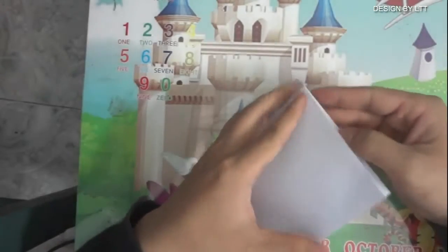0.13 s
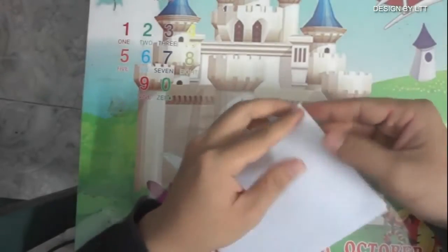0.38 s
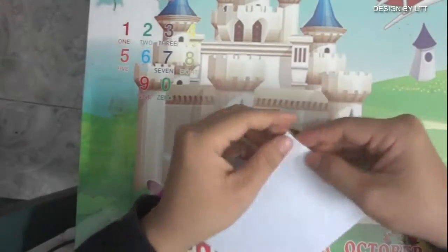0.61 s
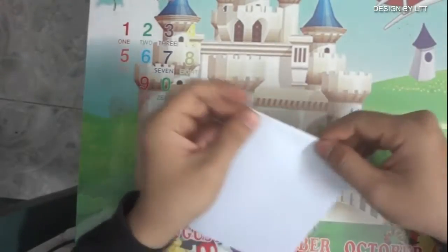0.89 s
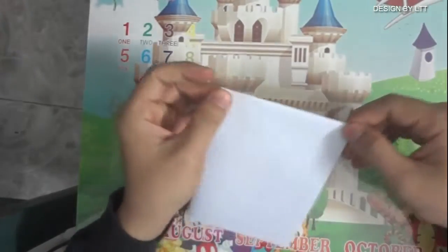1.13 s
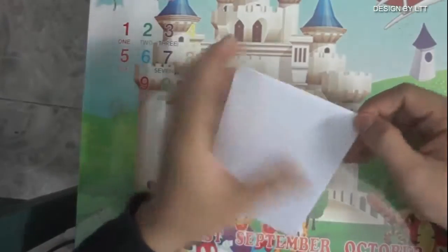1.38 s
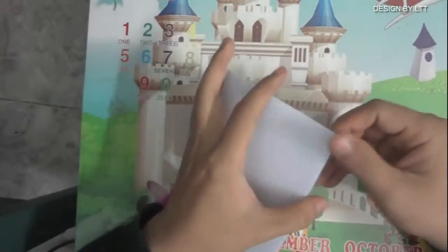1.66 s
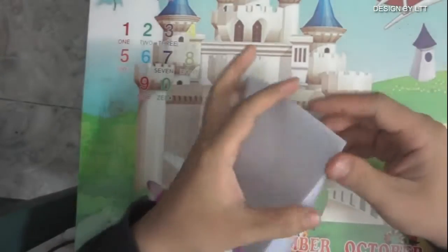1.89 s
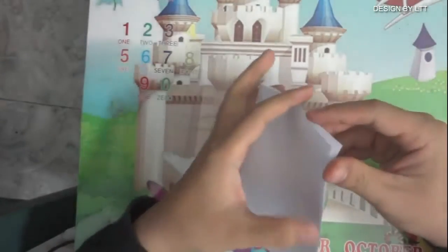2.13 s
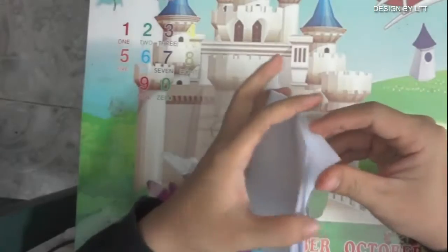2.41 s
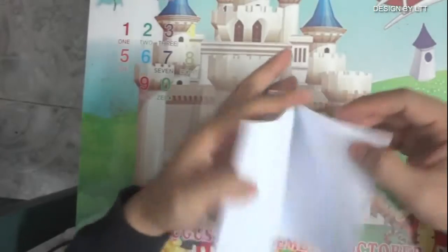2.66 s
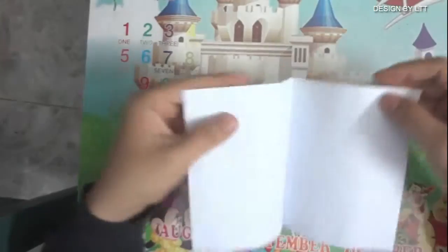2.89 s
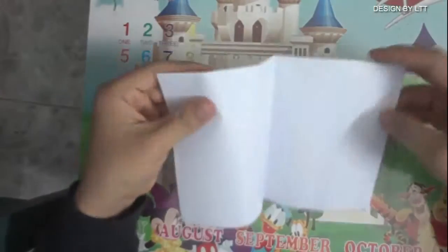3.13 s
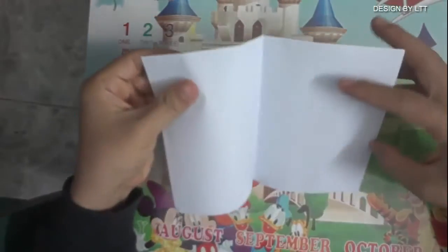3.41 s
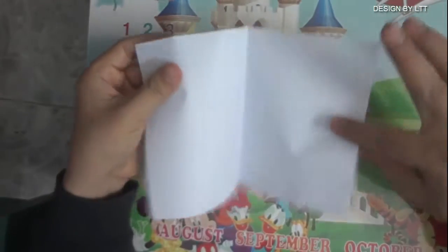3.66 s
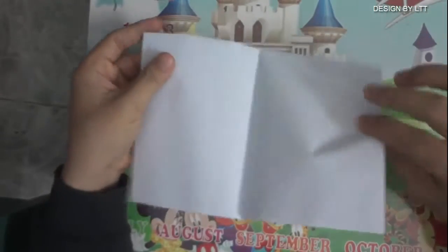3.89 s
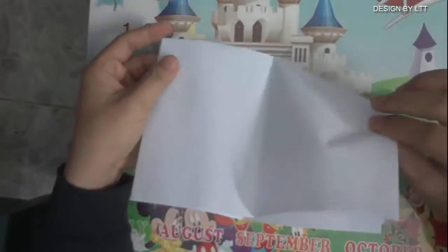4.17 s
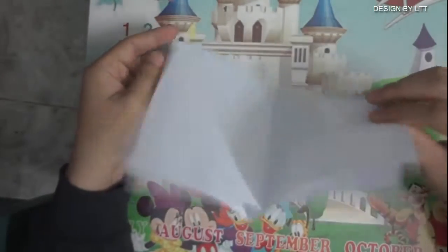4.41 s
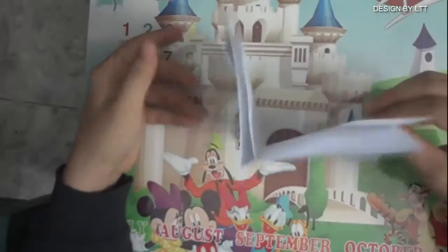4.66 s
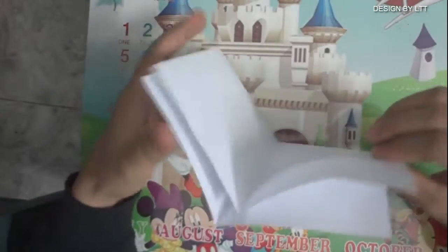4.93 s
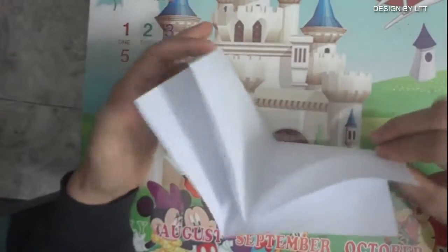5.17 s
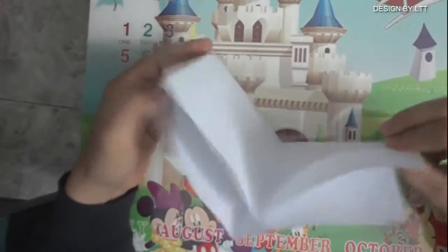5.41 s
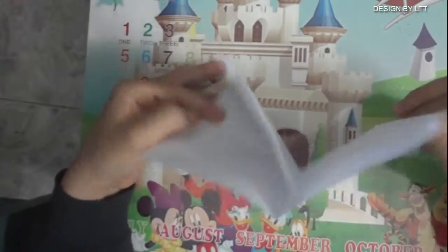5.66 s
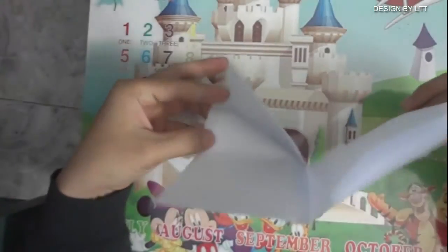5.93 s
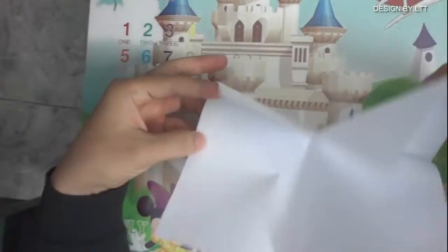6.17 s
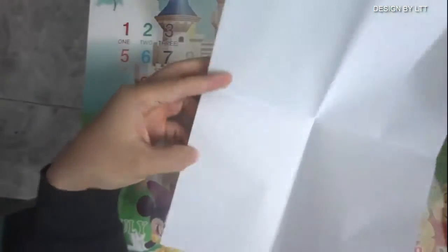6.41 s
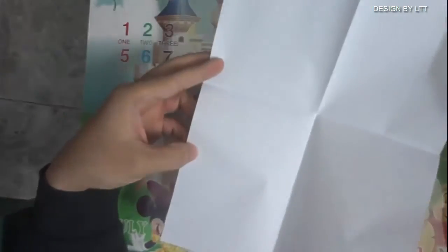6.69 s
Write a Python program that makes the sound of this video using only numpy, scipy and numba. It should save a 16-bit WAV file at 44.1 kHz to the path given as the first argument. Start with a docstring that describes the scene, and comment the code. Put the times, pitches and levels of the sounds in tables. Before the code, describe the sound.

Close in stereo, hands handle a sheet of paper in a small room with a machine humming and blowing steadily. Faint ticks and soft rubbing come first, then harder snaps and short scrapes as the folds buckle. The opened sheet hisses, drags and flutters with light fingertip bumps and puffs of air. A last burst of hard snaps fades into soft rubbing.

```python
"""Hands crease, open and turn a sheet of paper just below a small stereo microphone indoors.
All through, a machine nearby hums and blows, and the room briefly answers the paper.
First come faint snaps and soft rubbing; from about 2 s folds buckle with harder snaps and short scrapes.
At 3 s the sheet lies open: skin and edges hiss in grainy strokes, edges drag, fingertips bump, air puffs.
Near 6.1 s come a last few hard snaps, then the rubbing dies away."""
import sys
import numpy as np
from scipy import signal
from scipy.fft import rfft, irfft, next_fast_len
from scipy.io import wavfile
from scipy.ndimage import uniform_filter1d
from numba import njit

SR = 44100
rng = np.random.default_rng(int(sys.argv[2]) if len(sys.argv) > 2 else 0)


def inscribe(sig):
    """Save sig as 16-bit PCM at rate SR to the path in sys.argv[1].

    A 1-D sig is mono; a 2-D sig holds one channel per row.
    Samples are clipped to [-1, 1] before scaling.
    """
    pcm = np.round(np.clip(np.atleast_2d(sig).T, -1, 1) * 32767)
    wavfile.write(sys.argv[1], SR, pcm.astype(np.int16))


def decibels_to_gain(level_db):
    """Convert a level in decibels to a linear amplitude gain (20 dB per decade)."""
    exponent = np.asarray(level_db, float) / 20
    return 10 ** exponent


N = 300321
T = np.arange(N) / SR
SIDES = np.array([[1], [-1]])  # left, right


def level(x, db):
    """Set the rms level, which is the average strength of a sound."""
    return x * decibels_to_gain(db) / np.sqrt(np.mean(x ** 2))


def along(table, hz):
    """Read (Hz, value) points on a log-frequency axis."""
    points_hz, values = np.transpose(table)
    return np.interp(np.log(hz + 1), np.log(points_hz), values)


@njit
def svf(x, hz, width):
    """State-variable band-pass whose centre may move, gain 1 at the centre."""
    y, b, l = np.empty(len(x)), 0., 0.
    for i in range(len(x)):
        g, k = np.tan(np.pi * hz[i] / SR), width / hz[i]
        v = (b + g * (x[i] - l)) / (1 + g * (g + k))
        b, l, y[i] = 2 * v - b, l + 2 * g * v, k * v
    return y


def band(x, hz, width):
    """One resonance, fixed or moving."""
    return svf(x, np.clip(hz + np.zeros(len(x)), 20, SR / 2.3), 1. * width)


def walk(rate):
    """Slow random wandering: levels held 1 / rate s and smoothed twice; spread near 1."""
    k = int(SR / rate)
    held = np.repeat(rng.standard_normal(N // k + 1), k)
    return 1.23 * uniform_filter1d(uniform_filter1d(held, k), k)[:N]


def swell(s, rise_s, fall_s, peak_db):
    """Power of a gesture that climbs to its peak and dies away at even rates in dB."""
    late = T - s
    return decibels_to_gain(2 * (peak_db - 10 * np.where(late < 0, -late / rise_s, late / fall_s)))


def grit(n, spread_db):
    """Fibres catching and letting go: dense clicks of unequal but bounded size."""
    noise = rng.standard_normal(n)
    size = np.minimum(rng.exponential(size=n), np.log(50))
    return level(noise * decibels_to_gain(spread_db * size), 0)


# tones of the machine, before MACHINE_DB and the drift: (pitch [Hz], width of the wavering [Hz], level [dB])
HUM_TONES = [(241.7, 4.5, -67), (1034.3, 6.04, -62)]
# the hum sinks and grows slowly: (time [s], level [dB])
HUM_DRIFT = [(0, 0.5), (.9, -2.5), (2.9, 0.5), (3.2, 0.5), (5.9, 1.5), (6.8, -1.5)]
# tint of the air noise: (frequency [Hz], relative level per Hz [dB])
AIR_SPECTRUM = [(18, -15), (35, -34), (52, 3), (90, -11), (200, -4), (450, -7), (800, -3), (1050, 0),
                (1400, -6.5), (2500, -5), (3150, -12.5), (3470, -3), (3800, -13.5), (5000, -14.5),
                (9000, -23), (16000, -35)]
# how alike left and right air noise are: (frequency [Hz], likeness [0-1])
AIR_ALIKE = [(30, .97), (130, 0.5), (400, 0), (1400, 0.28), (4000, 0.66), (12000, 0.2)]
AIR_DB = -55  # before MACHINE_DB
MACHINE_DB, MACHINE_LEFT_DB = 2, 2.5  # gain of the whole machine; how much louder it is on the left
HUM_SWELL_DB = 1


def machine():
    """Air noise and a few wavering tones; bass and treble are more alike left and right than the middle."""
    n = next_fast_len(N)
    hz = np.arange(n // 2 + 1) * SR / n
    alike = np.clip(along(AIR_ALIKE, hz), 0, 1)
    mid, side = (rfft(rng.standard_normal(n)) * decibels_to_gain(along(AIR_SPECTRUM, hz)) for _ in range(2))
    mid = irfft(mid * np.sqrt(1 + alike), n)[:N]
    side = irfft(side * np.sqrt(1 - alike), n)[:N]
    air = level(mid + side * SIDES, AIR_DB)
    tones = np.zeros(N)
    for tone_hz, width, db in HUM_TONES:
        # each tone drifts in pitch over its width and a little in level
        loudness = decibels_to_gain(db + 2.14 * walk(15) + HUM_SWELL_DB * walk(2.86))
        phase = 2 * np.pi * np.cumsum(tone_hz + width / 2 * walk(25.02)) / SR
        tones += loudness * np.sqrt(2) * np.sin(phase)
    hum = tones * decibels_to_gain(np.interp(T, *np.transpose(HUM_DRIFT)))
    return (air + hum) * decibels_to_gain(MACHINE_DB + MACHINE_LEFT_DB / 2 * SIDES)


ROOM_DB, ROOM_T60_S, ROOM_ALIKE = -11, 0.35, 0.61  # level re the paper, time to die by 60 dB, likeness 0-1


def room(x):
    """Diffuse echoes with softened treble, partly different on each side, that die away evenly."""
    t = np.arange(SR // 2) / SR
    mid, side = rng.standard_normal((2, len(t)))
    tails = mid * np.sqrt(1 + ROOM_ALIKE) + side * np.sqrt(1 - ROOM_ALIKE) * SIDES
    tails = tails * decibels_to_gain(-60 * t / ROOM_T60_S) * (1 - np.exp(-t / 0.0016))
    tails = np.array([band(tail, 4000 / 3, 4000) + 1.16 * tail for tail in tails])
    tails /= np.sqrt(np.sum(tails ** 2) / 2)
    return decibels_to_gain(ROOM_DB) * signal.fftconvolve(x[None], tails, axes=1)[:, :N]


# puffs of air as the sheet swings; rise and fall are times for 10 dB:
# (time of the peak [s], rise [s], fall [s], level [dB])
PUFFS = [(.52, .3, 0.065, -59), (2.03, 0.14, 0.13, -60), (2.75, 0.15, 1, -56.5), (3.77, 0.061, 0.047, -56),
         (4.04, 0.17, 0.12, -59.5), (4.3, 0.33, 0.062, -54), (4.49, 0.032, 0.025, -45.5),
         (4.6, 0.14, 0.43, -50.5), (4.96, 0.13, 0.16, -49.5), (5.3, 0.39, 0.93, -55),
         (6.07, 0.025, .3, -52), (6.45, 0.045, 0.15, -51.5)]
STILL_DB = -64.5  # air between the puffs


def waft():
    """Air pushed by the sheet and the hands: a low, uneven flutter, partly different left and right."""
    mid = band(band(rng.standard_normal(N), 94, 750), 136, 690)
    side = band(band(rng.standard_normal(N), 440, 480), 230, 610)
    flutter = (mid + 0.73 * side * SIDES) * decibels_to_gain(2.8 * walk(25))
    power = decibels_to_gain(2 * STILL_DB) + sum(swell(*puff) for puff in PUFFS)
    return level(flutter, 0) * np.sqrt(power)


# fingertips and creases bump the desk or the sheet:
# (time [s], peak level [dB], ring pitch [Hz], decay by 60 dB [ms])
BUMPS = [(2.706, -31, 866, 27), (2.74, -52, 77, 500), (4.58, -50, 138, 300), (4.68, -49, 199, 152),
         (4.951, -50, 54.7, 500), (5.16, -53, 52.4, 500), (5.3, -58, 55, 500), (6.443, -40, 920, 18),
         (3.613, -31, 1060, 27), (4.005, -36.5, 706, 31), (4.478, -44, 345, 50), (4.482, -41, 634, 40),
         (4.574, -40, 505, 40), (4.909, -26.5, 630, 11), (4.945, -38, 460, 46), (5.275, -45, 705, 34),
         (6.255, -33, 688, 23), (6.437, -38, 844, 37), (6.44, -42, 269, 65)]


def bumps():
    """A soft blow, slower on larger panels: the panel rings low for a few cycles, a little rough."""
    out, t = np.zeros(N + SR // 2), np.arange(SR // 2) / SR
    for s, peak_db, ring_hz, decay_ms in BUMPS:
        blow_s, blow_width_s = max(.0012, 0.46 / ring_hz), max(0.00028, .12 / ring_hz)
        blow = np.exp(-((t - blow_s) / blow_width_s) ** 2)
        roughness = 0.056 * rng.standard_normal(len(t)) * np.exp(-t / 0.0076)
        # the narrower the resonance, the longer it rings
        ring = band(band(blow + roughness, ring_hz, 2200 / decay_ms), ring_hz, 2.0 * ring_hz)
        i = int(s * SR)
        out[i:i + len(t)] += decibels_to_gain(peak_db) * ring / np.abs(ring).max()
    return out[:N]


def desk(x, lag_ms, share):
    """The desk top returns an echo and a weaker second one right behind the sound, combing the treble."""
    i = np.arange(len(x))
    return x + sum(share ** k * np.interp(i - k * lag_ms * SR / 1000, i, x) / k for k in (1, 2))


# an edge dragged at an even pace, level before the fades:
# (time [s], length [ms], level [dB], centre [Hz], lag of the desk echo [ms])
DRAGS = [(0.861, 460, -58.5, 9250, 0.606), (1.822, 13, -42, 2780, 0.51), (1.939, 9, -39, 3360, .6),
         (3.901, 38, -50, 6000, .6), (4.004, 13, -37.5, 4530, 0.63), (4.02, 102, -36, 4880, 0.64),
         (4.373, 86, -37.5, 4570, .68), (4.141, 9.2, -28.5, 4700, 0.73), (4.172, 13, -34, 4330, 0.63),
         (4.249, 11, -37, 4200, 0.66), (4.283, 12.7, -38, 4340, 0.64), (4.677, 41, -43, 4280, 0.57),
         (4.729, 20.4, -37, 4230, 0.64), (4.798, 64, -35, 4640, 0.61), (4.909, 10, -34.5, 5300, 0.606),
         (4.945, 17, -35, 4260, 0.62), (5.424, 15, -39, 5030, .68), (5.452, 15, -40.5, 4860, 0.79),
         (5.474, 14, -38.5, 5000, 0.66), (5.567, 34, -33, 6500, .5), (5.61, 272, -43, 5200, .6),
         (5.735, 58, -43.5, 9000, .56), (5.957, 31, -42, 4470, 0.55), (6.063, 7, -29, 6000, 0.62)]
DRAG_ECHO, BLUR_MS = 0.9, 300  # share of the desk echo for the shortest drags; longer ones blur it away


def drags():
    """Gritty, slightly stuttering hiss with fades that grow with its length, close over the desk."""
    out, t = np.zeros(N), np.arange(SR // 2) / SR
    for s, length_ms, drag_db, centre_hz, lag_ms in DRAGS:
        length_s = length_ms / 1000
        fibres = band(grit(len(t), spread_db=5.0), centre_hz, 0.7 * centre_hz)
        stutter = decibels_to_gain(1.1 * walk(117)[:len(t)])
        hiss = band(fibres * stutter, centre_hz, 2.1 * centre_hz)
        hiss = desk(hiss, lag_ms, DRAG_ECHO * np.exp(-length_ms / BLUR_MS))
        hiss = hiss * decibels_to_gain(drag_db) / hiss[:int(length_ms * SR / 1000)].std()
        start = 1 - np.exp(-t / (0.0009 + 0.03 * length_s))
        stop = 1 / (1 + np.exp((t - length_s) / (.0005 + 0.077 * length_s)))
        i = int(s * SR)
        out[i:i + len(t)] += hiss * start * stop
    return out


def patchy(x, patchy_db):
    """The sheet bends all the time, so each third of an octave swells and fades on its own."""
    centres_hz = 1200 * 2 ** np.arange(0, 3.9, 1 / 3)
    return sum(band(x, hz, hz / 3 + hz ** 2 / 60000) * decibels_to_gain(patchy_db * walk(30)) for hz in centres_hz)


# strokes of skin and paper edges; rise and fall are times for 10 dB:
# (time of the peak [s], rise [s], fall [s], level of the rubbing force [dB], treble re that level [dB])
STROKES = [(.11, 0.07, 0.095, -49.5, -19), (.28, 0.21, 0.77, -52.5, -4), (.55, 0.072, 0.073, -63, 0),
           (.47, 0.055, 0.031, -54.5, 5), (.89, 0.2, 0.25, -58.5, 7), (1.31, 0.028, 0.05, -63, 8),
           (1.5, 0.017, 0.18, -49, -2.5), (1.83, 0.029, 0.069, -48.5, -7), (1.97, 0.029, 0.11, -45.5, -13),
           (2.45, 0.17, 0.29, -46, -14), (2.712, 0.0045, 0.12, -36.5, -7), (2.79, 0.041, 0.04, -56, -14),
           (2.94, 0.047, 0.39, -46.5, -4.5), (3.065, 0.026, 0.05, -56, -2), (3.3, 0.3, 0.33, -61.5, 6),
           (3.64, 0.048, 0.16, -48.5, -6), (3.81, 0.12, 0.14, -48.5, -7), (4.075, 0.09, 0.054, -41, -2),
           (3.975, 0.036, .02, -48.5, 3), (4.432, 0.14, 0.099, -37.5, -6), (4.63, 0.045, 0.24, -44.5, -5),
           (4.91, 0.029, 0.12, -40, -9), (5.1, 0.14, 0.19, -50.5, -4), (5.46, 0.1, 0.051, -41, -3),
           (5.6, 0.046, 0.04, -34.5, -6), (5.75, 0.14, 0.17, -38, -3.5), (6.035, 0.01, 0.04, -51, -2),
           (6.06, 0.036, 0.026, -41, 2), (6.1, 0.054, 0.064, -38.5, -10), (6.54, 0.13, 0.046, -53.5, -3)]
# how the layers lie, flap at a force of FLAP_PIVOT_DB:
# (time [s], resonance of the gap between them [Hz], its strength re the force [dB], flap of the sheet [dB])
LAYERS = [(0, 4000, -36, -55), (1.45, 3820, -29, -60), (1.76, 3670, 3, -56), (2.0, 3540, -26, -48.5),
          (2.45, 3400, -1, -60.5), (2.58, 3500, -20, -65), (2.71, 4200, -8, -52.5), (2.78, 3730, -5, -48),
          (2.9, 3570, -6, -49.5), (3.0, 3500, -14, -53), (3.55, 3280, -13, -63), (3.65, 2720, 1, -52),
          (3.75, 3240, -16, -55.5), (4.07, 4470, -4, -51), (4.3, 4400, -17, -58), (4.45, 4200, -23, -53.5),
          (4.95, 4270, -26, -50.5), (5.6, 4280, -18, -54), (6.04, 4000, -18, -52), (6.085, 3500, -11, -46),
          (6.25, 3320, -11.5, -44.5), (6.81, 3300, -35, -49)]
HOLD_DB, HOLD_TREBLE_DB = -66, -71  # force and treble of fingers merely holding the sheet
FLAP_SHARE, FLAP_PIVOT_DB = 0.77, -49  # the sheet flaps more as it is rubbed harder: dB per dB around this


def rub():
    """Gritty friction, uneven as the grip changes, coloured by the gap in the layers and the flapping sheet."""
    s, *columns = np.transpose(LAYERS)
    gap_hz, gap_db, flap_db = (np.interp(T, s, c) for c in columns)
    force_power, treble_power = decibels_to_gain(2 * HOLD_DB), decibels_to_gain(2 * HOLD_TREBLE_DB)
    for *gesture, treble_db in STROKES:
        stroke = swell(*gesture)
        force_power = force_power + stroke
        treble_power = treble_power + stroke * decibels_to_gain(2 * treble_db)
    force, bright = np.sqrt(force_power), np.sqrt(treble_power)
    flapping = decibels_to_gain(flap_db) * (force / decibels_to_gain(FLAP_PIVOT_DB)) ** FLAP_SHARE
    fibres = patchy(grit(N, spread_db=0.5), patchy_db=4.5) * decibels_to_gain(2.27 * walk(90))
    middle = level(band(band(fibres, 4270, 4900), 4570, 5800), -3.07)
    gap = level(band(band(fibres, gap_hz, 1140), gap_hz, 2100), 0)
    treble = level(band(band(fibres, 7500, 17000), 9250, 10200), 0)
    flap = band(band(grit(N, spread_db=3.0), 950, 2840), 1110, 3900)
    flap = level(flap * decibels_to_gain(2.7 * walk(90)), 0)
    return force * (middle + decibels_to_gain(gap_db) * gap) + bright * treble + flapping * flap


# buckling folds; pop and treble are averages over the first 10 ms:
# (time [s], peak level of the crack [dB], crack pitch [Hz], hollow pop re peak [dB], treble re peak [dB])
SNAPS = [(0.0706, -40, 2100, -8.5, -31), (.156, -40, 4000, -16, -18), (.285, -41, 6000, -26, -10),
         (0.29, -39, 6570, -26, -8.5), (0.3, -31, 4530, -9.5, -18), (0.536, -43, 5970, -25, -5),
         (0.555, -46, 2200, -21, -5), (1.5041, -40.5, 4100, -11, -4.5), (1.778, -35, 2090, -16.5, -39),
         (1.791, -33, 1800, -25, -34), (1.807, -42, 3000, -29, -30), (1.828, -30.5, 2400, -15, -32),
         (1.845, -38, 2200, -25, -30), (1.941, -27.5, 3240, -20.5, -17.5), (1.9598, -25, 3260, -33, -21),
         (1.9753, -28.5, 1590, -34, -19), (1.987, -37, 3200, -24, -22), (1.996, -34, 1600, -30, -18),
         (2.033, -38.5, 1400, -22, -26), (2.3518, -36, 4290, -24, -17), (2.363, -33, 3970, -22, -17),
         (2.6319, -31, 4000, -16.5, -14.5), (2.648, -31.5, 2210, -34, -25), (2.7019, -27, 4000, -30, -10),
         (2.7021, -11, 4220, -41, -18), (2.7038, -16, 2670, -28, -24), (2.718, -31, 4400, -30, -27),
         (2.7305, -19, 3480, -19.5, -20.5), (2.7725, -19.5, 3470, -19, -20.5),
         (2.7944, -27, 2390, -19, -34), (2.9162, -17.5, 3300, -24, -29), (2.943, -41, 9500, -30, -13),
         (3.057, -35.5, 3930, -19, -12.5), (3.1556, -37, 6760, -0.5, -7.5),
         (3.2534, -27.5, 3380, -11.5, -13), (3.386, -28, 3160, -8, -12), (3.5625, -29.5, 2560, -6, -10),
         (3.6064, -17, 2560, -12, -29), (3.697, -36.5, 2550, -5, -8.5), (3.749, -41, 2500, -6.5, -24),
         (3.7905, -32.5, 3150, -10, -13), (3.899, -31.5, 3720, -21, -12), (3.984, -39, 4960, -13, -5),
         (4.006, -26.5, 4050, -19, -9.5), (4.174, -25, 4470, -20, -15), (4.25, -22.5, 4080, -25.5, -18),
         (4.2862, -26.5, 4220, -21, -21), (4.3665, -32, 5970, -14, -24), (4.4353, -19, 2800, -31, -19),
         (4.462, -34, 4000, -10, -7), (4.573, -32.5, 3540, -19, -10), (4.619, -35, 3920, -18, -5.5),
         (4.797, -24.5, 4930, -23, -13.5), (4.8391, -20, 3480, -23, -20), (4.9085, -28, 4000, -25, -16),
         (4.9105, -22, 5300, -26, -17), (4.9423, -24.5, 5100, -13.5, -12),
         (4.9567, -21.5, 3380, -19, -17.5), (5.0888, -29.5, 3480, -19, -12), (5.2031, -41, 5660, -22, -8),
         (5.3727, -26.5, 4380, -15.5, -13), (5.4744, -31, 4000, -25, -8.5), (5.5, -38, 1510, -6, -30),
         (5.5237, -36, 4180, -17, -9), (5.63, -34, 4500, -22, -17), (5.972, -28.5, 3800, -25, -14.5),
         (6.01, -43, 9500, -31, -8), (6.027, -27.5, 4760, -25, -18), (6.0751, -16.5, 3270, -27, -28),
         (6.0771, -14.5, 3550, -28.5, -34), (6.0975, -20, 4000, -38, -21), (6.1, -11, 5560, -27, -41),
         (6.2525, -27.5, 1910, -20, -44), (6.434, -26, 1770, -13.5, -58), (6.524, -36.5, 4500, -19, -13.5)]
POP_HZ, POP_OPEN_HZ, OPENS_S = 1105, 977, 3  # the pocket is deeper once the sheet lies open
POP_SCATTER, SCRAPE_SCATTER = 0.021, 0.15  # random spread of pop pitch and scrape length, as shares
SCRAPE_MS = 7.3  # for a soft fold with a crack at 3500 Hz
DULL_SHORTENS = 0.2  # a duller fold scrapes for a shorter time: power of the crack pitch
SOFT_DB, SCRAPE_PER_DB = -21, .06  # a fold louder than SOFT_DB scrapes for less time: share lost per dB


def snaps():
    """Each fold jumps over with a crack and a hollow pop, then scrapes for a few ms."""
    out, t = np.zeros(N + 2048), np.arange(2048) / SR
    first = slice(0, SR // 100)
    for s, peak_db, crack_hz, pop_db, treble_db in SNAPS:
        size, length = rng.standard_normal(2)
        pop_hz = (POP_HZ if s < OPENS_S else POP_OPEN_HZ) * np.exp(POP_SCATTER * size)
        brightness = DULL_SHORTENS * np.log(crack_hz / 3500)
        loudness = SCRAPE_PER_DB * max(peak_db - SOFT_DB, 0)
        scrape_ms = SCRAPE_MS * np.exp(SCRAPE_SCATTER * length + brightness - loudness)
        scrape_s = scrape_ms / 1000
        fibres = grit(len(t), spread_db=3.0)
        scrape = fibres / (1 + np.exp((t - scrape_s) / (0.43 * scrape_s)))
        # a fold that scrapes briefly spends more of its energy in the first jump
        jump = (6.0 / scrape_ms) ** 1.9 * (5 * (t == 0) + fibres * np.exp(-t / 0.0011))
        # the bent sheet rings for a moment with many modes, other ones at every fold
        modes = (t[:256] == 0) + 0.06 * rng.standard_normal(256) * np.exp(-t[:256] / 0.0008)
        crack = np.convolve(2.4 * jump + scrape, modes)[:len(t)]
        for width in (0.65, 1.7, 2.0):
            crack = band(crack, crack_hz, width * crack_hz)
        # a soft push of under half a millisecond rings the air pocket under the fold
        push = np.exp(-((t - .0008) / 0.00025) ** 2) + 0.52 * scrape
        pop = band(band(push, pop_hz, 550), pop_hz, 1300)
        treble = band(band(0.62 * jump + scrape, 6570, 9900), 9700, 8700)
        sound = crack / np.abs(crack).max()
        sound += decibels_to_gain(pop_db) * pop / pop[first].std()
        sound += decibels_to_gain(treble_db) * treble / treble[first].std()
        i = int(s * SR)
        out[i:i + len(t)] += decibels_to_gain(peak_db) * sound
    return out[:N]


def scene():
    """The sheet is near and almost central; the room and the machine are wide."""
    paper = desk(rub() + snaps(), lag_ms=0.61, share=0.0083) + drags() + bumps()
    return paper * decibels_to_gain(-0.25 * SIDES) + room(paper) + waft() + machine()


def top_cut(x):
    """Nothing passes above the cut-off."""
    return signal.sosfilt(signal.butter(12, 16680, fs=SR, output="sos"), x)


def record(dry):
    """A steep low-pass filter cuts the very top of the treble."""
    cut = signal.ellip(8, .2, 60, 15900, fs=SR, output="sos")  # edge at 15900 Hz
    return top_cut(signal.sosfilt(cut, dry))


dry = scene()
out = record(dry)
inscribe(out)
```